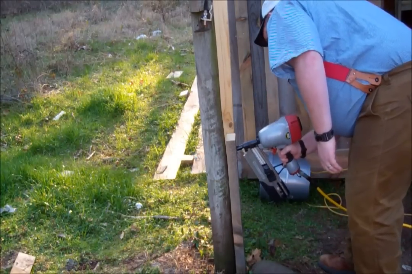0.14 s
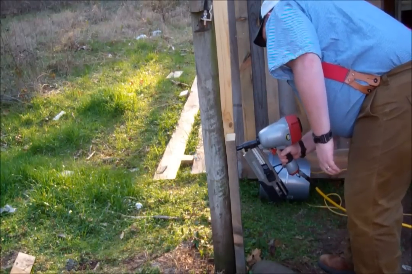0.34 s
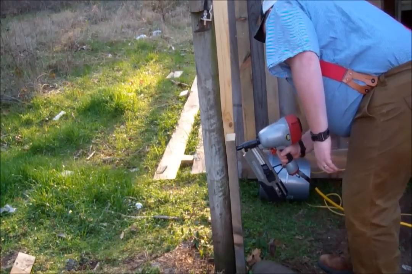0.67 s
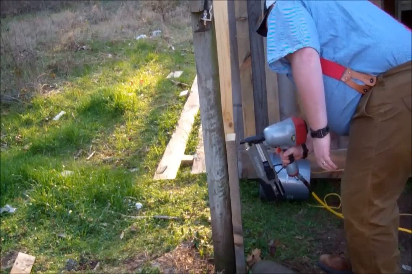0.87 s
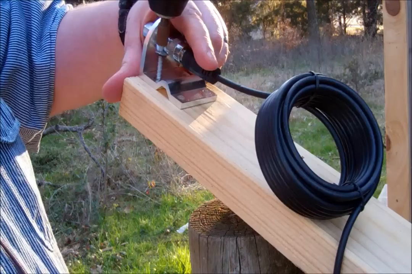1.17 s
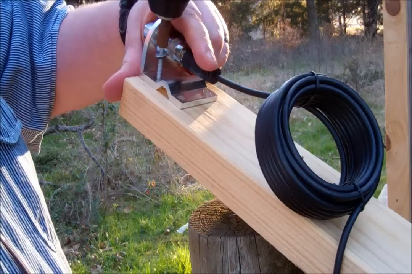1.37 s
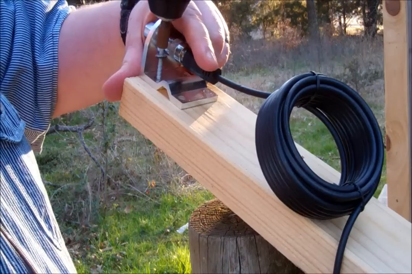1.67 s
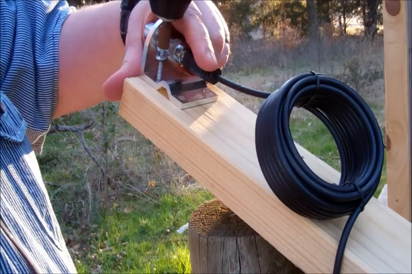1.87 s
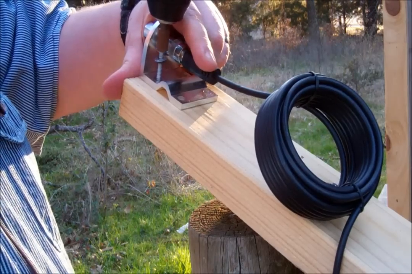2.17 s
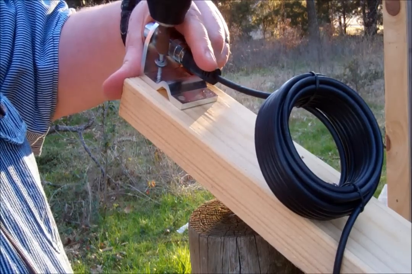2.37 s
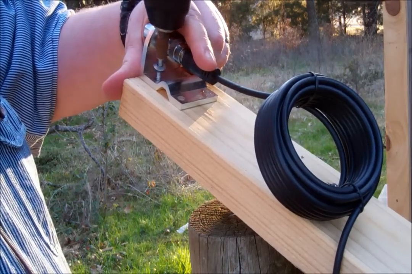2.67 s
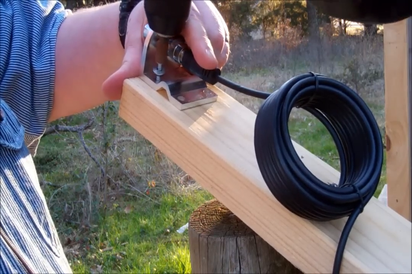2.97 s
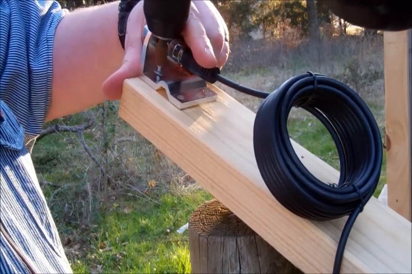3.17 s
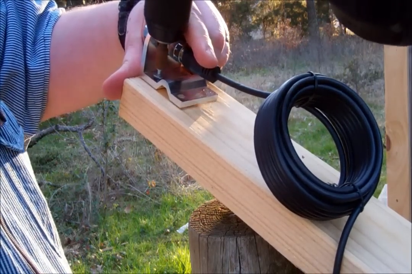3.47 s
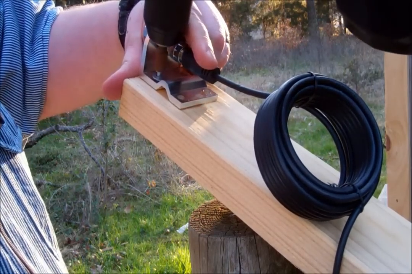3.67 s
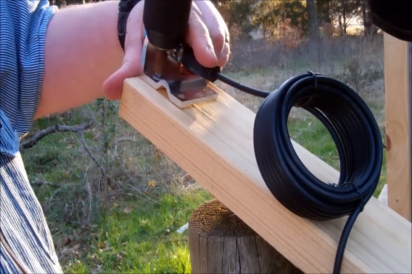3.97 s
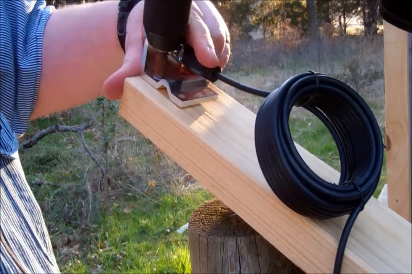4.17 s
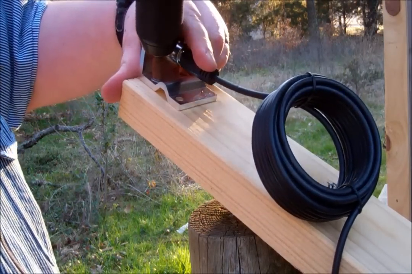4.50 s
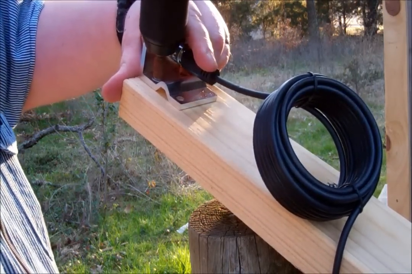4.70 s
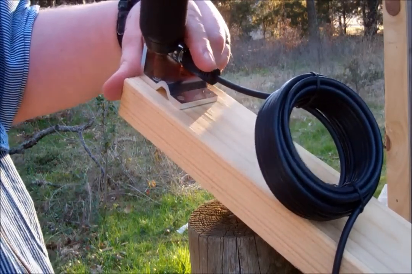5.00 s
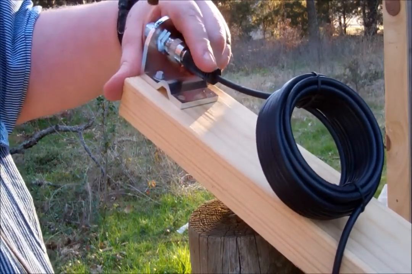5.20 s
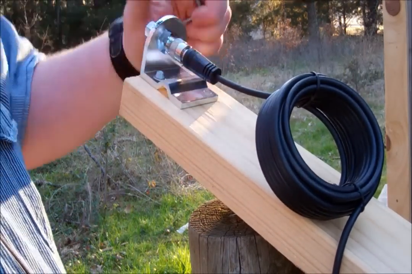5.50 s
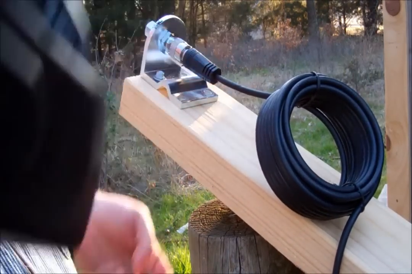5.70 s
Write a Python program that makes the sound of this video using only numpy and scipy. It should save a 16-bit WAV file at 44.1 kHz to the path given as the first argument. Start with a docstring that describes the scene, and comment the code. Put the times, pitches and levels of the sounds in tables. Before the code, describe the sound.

Outdoors, close stereo microphones, the left slightly brighter. From 0 to 0.95 s there is low distant traffic, breeze and leaves, with cloth rubbing, a small bright click at 0.28 s and a soft low bump at 0.66 s. At 0.97 s a pneumatic nailer fires once: a very loud, dry crack with woody knock and air bursts, then quieter exhaust puffs and a recoil clack at 1.08-1.14 s, with short open-air scatter. At 1.27 s the scene cuts abruptly to a cordless drill, quickly spinning up. Its hissy, grinding gear whine slides steadily down while the tones strengthen under load; from 4.26 s it grows rough and chattering, drops steeply and stalls around 4.65 s. The quiet background with a faint low hum swells back. From 4.77 to 5.6 s hands rub and tap the metal bracket, leaving small damped rings, then quiet ambience.

```python
"""Outdoor carpentry. Amid traffic, leaves and handling sounds, a pneumatic nailer drives one nail into a post:
turbulent air jets hiss, the blow and recoil excite the modes of the post, and the exhaust escapes.
The scene then changes abruptly to a cordless drill sinking a long screw over a faint hum: gear tones follow the
shaft rate, falling in pitch and mostly gaining level as the screw bites, until the motor stalls.
Finally hands rub and knock on a metal bracket, whose damped modes ring."""
import sys
import numpy as np
from scipy import signal
from scipy.fft import rfft, irfft
from scipy.io import wavfile

SR = 44100
rng = np.random.default_rng(int(sys.argv[2]) if len(sys.argv) > 2 else 0)


def inscribe(sig):
    """Save sig as 16-bit PCM at rate SR to the path in sys.argv[1].

    A 1-D sig is mono; a 2-D sig holds one channel per row.
    Samples are clipped to [-1, 1] before scaling.
    """
    pcm = np.round(np.clip(np.atleast_2d(sig).T, -1, 1) * 32767)
    wavfile.write(sys.argv[1], SR, pcm.astype(np.int16))


N = 257984
T = np.arange(N) / SR
FREQ = np.maximum(np.arange(N // 2 + 1) * SR / N, 1)

# the abrupt change from the post to the bracket
CHANGE_S = 1.268

# relative spectrum of the outdoor background by the post: (frequency [Hz], level [dB])
YARD_COLOUR = [(15, -33), (25, -3), (88, -10), (192, -15.5), (534, -3.5), (1000, -5.5), (1140, -12.5),
               (1370, -15), (3330, -21), (3610, -20.5), (4110, -19.5), (6250, -23.5), (8120, -22.5),
               (13000, -26.5)]
# relative spectrum of the outdoor background by the bracket: (frequency [Hz], level [dB])
FIELD_COLOUR = [(15, -36), (25, -2), (127, -3.5), (250, -8.5), (712, -1.5), (1030, -9.5), (1110, -3.5),
                (1200, -11), (1690, -11), (6940, -18), (8330, -17), (9500, -17), (13000, -22.5)]
# background levels before the dips; the hum is relative to the background by the bracket
YARD_DB, FIELD_DB = -53.5, -51.5
HUM_HZ, HUM_DB = 120, -5.5
# background and rustle by the post sink at the shot and swell back slowly
SHOT_S, SHOT_DIP_DB, SHOT_SINK_S, SHOT_RECOVER_S = 0.972, 26, 0.003, 2.5
# those by the bracket stay sunk under the drill and swell back once the motor has stopped
STOPPED_S, DRILL_DIP_DB, DRILL_SINK_S, DRILL_RECOVER_S = 4.68, 17.5, 0.38, 0.25

# relative spectrum of rubbing: (frequency [Hz], level [dB])
RUB_COLOUR = [(300, -4), (1200, 2.5), (2500, -2.5), (5500, -3.5), (7500, -7.5), (10000, -7.5), (13000, -26)]
# strokes of sleeves and hands: (time of the height [s], level [dB], half length [s])
RUBS = [(.01, -49, 0.027), (0.254, -56.5, 0.15), (4.91, -59.5, 0.28), (5.122, -56.5, 0.065),
        (5.458, -51, 0.04), (5.569, -52.5, .11)]
# steady rustle of clothes, before the dips
RUSTLE_POST_DB, RUSTLE_BRACKET_DB = -63.5, -65

# clicks and knocks of handling: (time [s], level [dB], centre [Hz], T60 [s])
KNOCKS = [(.278, -40, 5360, 0.016), (4.771, -44, 3950, 0.0093), (4.962, -34, 2060, .007),
          (4.969, -37, 1860, 0.027), (5.095, -42, 2370, 0.043), (5.145, -42.5, 1700, 0.02),
          (5.158, -41.5, 327, 0.053), (5.16, -40.5, 2530, 0.021), (5.173, -41, 2220, 0.018),
          (5.181, -47, 750, 0.044), (5.456, -41.5, 5500, 0.041), (5.523, -36.5, 1490, .035),
          (5.562, -42, 1790, .027)]
# soft low bumps: (time [s], level [dB], centre [Hz], T60 [s])
BUMPS = [(0.656, -45, 85, 0.067), (4.789, -52, 40.2, 0.74)]
KNOCK_OCTAVES, BUMP_OCTAVES = 0.98, 0.55
# modes of the metal bracket: (frequency [Hz], relative level [dB], T60 [s])
BRACKET_MODES = [(1070, 3, 0.54), (1162, 9.5, 0.48), (1640, 4, 0.28), (1700, 7, 0.14)]

# air bursts of the nailer: (time [s], level [dB], open time [s], fade [dB/s])
AIR_BURSTS = [(0.9704, -31, 0.0065, 2200), (.980, -44, 0.0093, 1000), (0.987, -32, 0.0087, 950),
              (1.077, -52, .004, 481), (1.087, -47, 0.0089, 608), (1.098, -37, 0.0094, 463),
              (1.127, -43.5, 0.0019, 613), (1.14, -67.5, 0.051, 215)]
# relative spectrum of the air jets: (frequency [Hz], level [dB])
AIR_COLOUR = [(88, -25), (150, -15), (395, -13.5), (1230, -3), (1580, -6), (1700, -4.5), (2590, -6.5),
              (3070, -1.5), (3780, -3.5), (9050, -1), (14000, -16)]
# blows of driver, recoil and returning piston:
# (time [s], peak level [dB], contact time [s], ringing relative to the blow [dB])
BLOWS = [(0.9731, -15, 0.00041, -8.5), (0.9885, -23, 0.0019, 0), (0.997, -28.5, 0.000062, 0),
         (1.1, -52, 0.00048, -2), (1.133, -39.5, 0.00059, 0.5), (1.137, -35, 0.00045, -2.5)]
# modes of nailer and post: (frequency [Hz], relative level [dB], T60 [s])
POST_MODES = [(121, -25, 0.06), (227, -23, 0.054), (350, -8, 0.028), (438, -18.5, 0.067), (730, -42, .04),
              (1056, -7, 0.034), (1460, -20, 0.042), (2190, -2.5, 0.013), (2920, -7, 0.025)]
# the driver cracks on the nail
CRACK_S, CRACK_DB, CRACK_HZ, CRACK_OCTAVES, CRACK_T60_S = 0.9734, -32, 1490, 1.56, 0.0095
# the exhaust valve pings as it opens: (frequency [Hz], level [dB], T60 [s])
VALVE_MODES = [(1740, -45, .035), (2330, -37, 0.033)]
VALVE_S = 1.0845

# shaft rate as the screw drags the motor down, before spin-up and wobble: (time [s], rate [Hz])
SHAFT = [(1.8, 233.2), (2.1, 229.4), (2.7, 211.6), (3, 206.9), (3.5, 193), (3.75, 185), (4, 178.2),
         (4.3, 165.9), (4.45, 145.6), (4.565, 120.8), (4.65, 60)]
# gear tones, before the gearbox resonances:
# (multiple of the shaft rate [1], level running free [dB], level under load [dB])
TEETH = [(11, -63.5, -50.5), (12, -57.5, -57.5), (22, -61.5, -48.5), (23, -60, -46), (24, -75, -68),
         (33, -73, -67), (34, -68, -48)]
# motor tones: (multiple of the shaft rate [1], level running free [dB], level under load [dB])
ROTOR = [(1, -61, -71.5), (1.5, -77, -76), (2, -63, -75.5), (3, -66, -67), (5, -56.5, -54), (14, -56, -56)]
# gearbox resonances and hollows that the gear tones glide through: (frequency [Hz], width [Hz], boost [dB])
GEARBOX = [(1747, 93, 10), (2160, 150, 6), (2505, 200, 7.5), (3330, 740, 7.5), (4079, 350, -4),
           (4570, 490, 8.5), (6660, 1340, 7.5), (7240, 460, -14)]
# relative spectrum of the drill noise: (frequency [Hz], level [dB])
DRILL_COLOUR = [(59, -61), (100, -51), (177, -24), (226, -26), (300, -22.5), (451, -13.5), (542, -11.5),
                (1110, -3.5), (2260, -3.5), (2550, -1.5), (5640, -3.5), (7500, -4), (12000, -11),
                (13000, -21.5)]
# resonances and hollows of the drill housing: (frequency [Hz], width [Hz], boost [dB])
HOUSING = [(1487, 380, 4.5), (2096, 24, 5.5), (2572, 96, 3.5), (3095, 290, 3), (3970, 350, 3.5),
           (4350, 470, 3), (5290, 69, 4.5), (5750, 250, 0.5), (5960, 160, 3), (7100, 55, 3.5),
           (7410, 260, 4.5), (8000, 180, 3.5), (8900, 530, -2), (9420, 500, 4), (11900, 190, 3)]
# the motor starts short of full speed by this share and catches up
SPIN_UP_SHORT, SPIN_UP_S = 0.35, 0.122
# meanwhile the whole drill surges and the gears take load (0-1)
SURGE_S, SURGE_LENGTH_S, SURGE_DB, SURGE_LOAD = 1.395, 0.047, 2, 0.74
# loss of shaft rate at which the load on the gears levels off
BITE_HZ = 33
# levels before the housing: grinding eases as the screw sinks, brush and fan hiss holds
GRIND_DB, GRIND_EASE_DB_PER_S, HISS_DB = -46.5, 2, -46
# the screw head seats: grinding swells again and the gears chatter more (0-1)
SEAT_S, SEAT_LENGTH_S, SEAT_DB = 4.26, 0.29, 5
CHATTER, SEAT_CHATTER = 0.35, 0.58
# below this shaft rate the motor and gear tones die away
FAINT_HZ = 107.9
STALL_S, STALL_LENGTH_S = 4.605, 0.081

# stereo width of near tools: (frequency [Hz], side minus mid [dB])
WIDTH = [(150, -12), (1500, -21), (3200, -20.5), (5000, -6), (7500, -5.5), (13000, -9)]
# stereo width of diffuse sound: (frequency [Hz], side minus mid [dB])
DIFFUSE = [(35, -1), (100, -4), (500, -11.5), (1500, -6), (3200, -3), (7000, -1.5), (13000, 0.5)]
# balance of the microphone pair: (frequency [Hz], left minus right [dB])
LEAN = [(200, 0.85), (2800, 0.37), (4800, 1.8), (7000, 3.4), (9500, 6.1), (12000, 0.41)]
TOP_HZ = 12700


def undb(db):
    """Amplitude gain is ten to the power of the level in decibels over twenty."""
    return 10 ** (np.asarray(db) / 20)


def shape(points):
    """A spectrum follows from its points by interpolation of level over log frequency."""
    hz, db = np.transpose(points)
    return undb(np.interp(np.log(FREQ), np.log(hz), db))


def band(lo_hz, hi_hz):
    """An ideal band passes only the frequencies between its edges."""
    return (FREQ > lo_hz) & (FREQ < hi_hz)


def noise(gain, within=1, width=WIDTH):
    """Independent mid and side noises add to a stereo field; the mid has rms 1 within a band."""
    mid, side = rfft(rng.standard_normal((2, N))) * gain
    side = side * shape(width)
    stereo = irfft([mid + side, mid - side], N)
    return stereo / irfft(mid * within, N).std()


def walk(rate_hz):
    """Low-passed noise is a smooth random wander, here of standard deviation 1."""
    wander = irfft(rfft(rng.standard_normal(N)) / (1 + (FREQ / rate_hz) ** 4), N)
    return wander / wander.std()


def swell(s, half_s):
    """A Gaussian envelope rises and falls smoothly around a moment."""
    return np.exp(-((T - s) / half_s) ** 2)


def dip(start_s, end_s, depth_db, sink_s, recover_s):
    """A level relaxes exponentially downward from the start and upward again from the end."""
    sunk = 1 - np.exp(-np.maximum(T - start_s, 0) / sink_s)
    remaining = np.exp(-np.maximum(T - end_s, 0) / recover_s)
    return undb(-depth_db * sunk * remaining)


def decay(s, t60):
    """Linear damping loses 60 dB in every T60 after the onset, here down to -120 dB."""
    return (T >= s) * undb(-60 * np.clip((T - s) / t60, 0, 2))


def ring(modes):
    """The impulse response of a struck body is a sum of damped sinusoidal modes."""
    t = T[:SR // 2]
    return sum(undb(db - 60 * t / t60) * np.sin(2 * np.pi * hz * t) for hz, db, t60 in modes)


def through(x, response):
    """A linear system answers any sound by convolution with its impulse response."""
    return signal.fftconvolve(np.atleast_2d(x), np.atleast_2d(response), axes=1)[:, :N]


def resonances(at_hz, peaks):
    """Each resonance raises, or hollow lowers, the level in dB along a bell curve in frequency."""
    return sum(db / (1 + (2 * (at_hz - hz) / width) ** 2) for hz, width, db in peaks)


def knock(s, db, hz, octaves, t60):
    """A brief impact is a dying burst of noise centred on one frequency."""
    colour = 1 / (1 + (np.log2(FREQ / hz) / octaves) ** 4)
    return undb(db) * decay(s, t60) * noise(colour)


def outdoors(colour, gust_db=4, gust_hz=90, swell_db=1.13):
    """Distant traffic and leaves form a diffuse field; the breeze modulates its bass more strongly."""
    air = noise(shape(colour), width=DIFFUSE)
    bass = irfft(rfft(air) / (1 + (FREQ / gust_hz) ** 4), N)
    distant = (air - bass) * undb(swell_db * walk(3.0))
    buffeting = bass * undb(gust_db * walk(12))
    return distant + buffeting


def hum(waver_db=1.6):
    """A steady pure tone, sqrt(2) times its rms at the peak, wavers slightly in level."""
    level = undb(HUM_DB + waver_db * walk(6.2))
    return np.sqrt(2) * level * np.sin(2 * np.pi * HUM_HZ * T)


def rubbing(rustle, scratch_db=2.5):
    """Friction of cloth and skin is noise: powers of strokes and rustle add, and level jitter makes it scratchy."""
    strokes = sum((undb(db) * swell(s, half_s)) ** 2 for s, db, half_s in RUBS)
    friction = noise(shape(RUB_COLOUR), width=DIFFUSE)
    return friction * np.sqrt(rustle ** 2 + strokes) * undb(scratch_db * walk(200))


def handling(ring_db=-52):
    """Impacts of hands are noise bursts; those on the bracket also excite its modes."""
    knocks = sum(knock(s, db, hz, KNOCK_OCTAVES, t60) for s, db, hz, t60 in KNOCKS)
    bumps = sum(knock(s, db, hz, BUMP_OCTAVES, t60) for s, db, hz, t60 in BUMPS)
    on_bracket = knocks * (T > CHANGE_S)
    return knocks + bumps + undb(ring_db) * through(on_bracket, ring(BRACKET_MODES))


def nailer_air(rise_s=0.0017, sputter_db=0.5):
    """Turbulent jets from valve and exhaust are incoherent noise, so their powers add."""
    power = 0
    for s, db, open_s, fade in AIR_BURSTS:
        opening = np.clip((T - s) / rise_s, 0, 1)
        fading = undb(db - fade * np.clip(T - s - open_s, 0, 0.5))
        power = power + (opening * fading) ** 2
    return noise(shape(AIR_COLOUR)) * np.sqrt(power) * undb(sputter_db * walk(400))


def nailer_blows():
    """Each contact is a smooth force pulse, heard directly and as the modes that it excites."""
    push, drive = 0, 0
    for s, db, contact_s, ring_db in BLOWS:
        pulse = np.sin(np.pi * np.clip((T - s) / contact_s, 0, 1)) ** 2
        push = push + undb(db) * pulse
        # equal area, so that contact time alters the spectrum but not the total push
        drive = drive + undb(db + ring_db) * pulse / pulse.sum()
    return through(drive, ring(POST_MODES)) - push


def nailer(echo_db=-18, echo_t60=0.18):
    """Air and blows reach the ear directly and through the decaying scatter of the yard."""
    direct = nailer_air() + nailer_blows()
    scatter = (noise(band(200, 11400)) * decay(0, echo_t60))[:, :SR // 2]
    scatter = scatter / np.sqrt(np.sum(scatter[0] ** 2))  # unit energy on the left
    return direct + undb(echo_db) * through(direct, scatter)


def nailer_metal():
    """The driver's impact on the nail is a noise burst; the opening exhaust valve rings in damped modes."""
    crack = knock(CRACK_S, CRACK_DB, CRACK_HZ, CRACK_OCTAVES, CRACK_T60_S)
    ping = 0
    for hz, db, t60 in VALVE_MODES:
        ping = ping + undb(db) * decay(VALVE_S, t60) * np.sin(2 * np.pi * hz * (T - VALVE_S))
    return crack + ping


def gear_whine(shaft_hz, turns, load, seated, slip=0.2, smear=0.68, waver_db=1.14, rasp_hz=110, seat_db=-42):
    """Rotating parts sound at multiples of the shaft rate; load sets their levels and chatter smears the gears."""
    chatter = np.clip(CHATTER + SEAT_CHATTER * seated, 0, 1)
    clean = np.sqrt(1 - chatter ** 2)
    tones = 0
    for multiple, free_db, loaded_db in TEETH:
        db = free_db + load * (loaded_db - free_db) + waver_db * walk(4.9)
        db = db + resonances(multiple * shaft_hz, GEARBOX)
        # slip [rad] is the random wander of the phase
        tone = np.exp(2j * np.pi * multiple * turns + 1j * slip * walk(28))
        rasp = smear * chatter * (walk(rasp_hz) + 1j * walk(rasp_hz))
        tones = tones + undb(db) * tone * (clean + rasp)
    for multiple, free_db, loaded_db in ROTOR:
        db = free_db + load * (loaded_db - free_db) + waver_db * walk(32)
        tones = tones + undb(db) * clean * np.exp(2j * np.pi * multiple * turns)
    tones = tones / (1 + (FAINT_HZ / shaft_hz) ** 10)
    # the highest gear tone shrieks roughly as the screw head seats
    shriek = np.exp(2j * np.pi * 45 * turns) * (walk(220) + 1j * walk(300))
    tones = tones + undb(seat_db) * (seated * chatter) ** 2 * shriek
    return np.sqrt(2) * tones.real


def drill(split_hz=3600, throb=0.14, grit_db=1.0, wobble=0.001043, uneven_db=0.41):
    """Low grinding noise, hiss modulated once a turn and gear tones are filtered by the housing's resonances."""
    dragged_hz = np.interp(T, *np.transpose(SHAFT))
    running_s = np.maximum(T - CHANGE_S, 0)
    shaft_hz = dragged_hz * (1 - SPIN_UP_SHORT / (1 + (running_s / SPIN_UP_S) ** 3))
    turns = np.cumsum(shaft_hz * (1 + wobble * walk(13.9))) / SR
    surge = swell(SURGE_S, SURGE_LENGTH_S)
    # the more speed the screw takes from the motor, the harder the teeth press
    load = np.tanh((dragged_hz.max() - dragged_hz) / BITE_HZ) + SURGE_LOAD * surge
    seated = np.clip((T - SEAT_S) / SEAT_LENGTH_S, 0, 1)

    # share of the noise power that belongs to the grinding
    low = 1 / (1 + (FREQ / split_hz) ** 4)
    grind = noise(shape(DRILL_COLOUR) * np.sqrt(low), band(600, 1700))
    hiss = noise(shape(DRILL_COLOUR) * np.sqrt(1 - low), band(7600, 12000))
    grind_db = GRIND_DB - GRIND_EASE_DB_PER_S * running_s + SEAT_DB * seated + grit_db * walk(140)
    grind = grind * undb(grind_db)
    hiss = hiss * undb(HISS_DB) * (1 + throb * np.sin(2 * np.pi * turns))

    effort = undb(SURGE_DB * surge + uneven_db * walk(2.9))
    inside = effort * (grind + hiss + gear_whine(shaft_hz, turns, load, seated))
    running = irfft(rfft(inside) * undb(resonances(FREQ, HOUSING)), N)
    # the sound collapses ever faster once the motor stalls
    stalled = np.clip((T - STALL_S) / STALL_LENGTH_S, 0, 2)
    return running * undb(-60 * stalled ** 2)


def scene():
    """Sources superpose linearly: first the nailer at the post, then the drill at the bracket."""
    shot_dip = dip(SHOT_S, SHOT_S, SHOT_DIP_DB, SHOT_SINK_S, SHOT_RECOVER_S)
    drill_dip = dip(SHOT_S, STOPPED_S, DRILL_DIP_DB, DRILL_SINK_S, DRILL_RECOVER_S)
    yard = outdoors(YARD_COLOUR) * undb(YARD_DB) * shot_dip
    field = (outdoors(FIELD_COLOUR) + hum()) * undb(FIELD_DB) * drill_dip
    rustle_by_post = undb(RUSTLE_POST_DB) * shot_dip
    rustle_by_bracket = undb(RUSTLE_BRACKET_DB) * drill_dip
    rustle = np.where(T < CHANGE_S, rustle_by_post, rustle_by_bracket)
    by_post = yard + nailer() + nailer_metal()
    by_bracket = field + drill()
    change = np.clip((T - CHANGE_S) / 0.0056, 0, 1)  # crossfade of 5.6 ms
    return by_post * (1 - change) + by_bracket * change + rubbing(rustle) + handling()


def record(dry):
    """Unequal microphone responses make the left brighter; a steep low-pass filter cuts the top."""
    lean = np.sqrt(shape(LEAN))  # half of the difference on each side
    heard = irfft(rfft(dry) * [lean, 1 / lean], N)
    low_pass = signal.ellip(8, 0.2, 70, TOP_HZ, fs=SR, output="sos")
    return signal.sosfilt(low_pass, heard)


dry = scene()
out = record(dry)
inscribe(out)
```